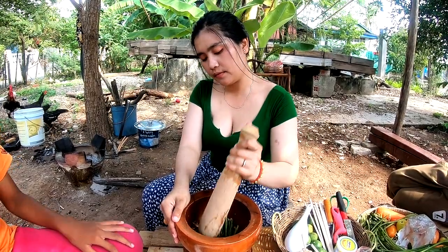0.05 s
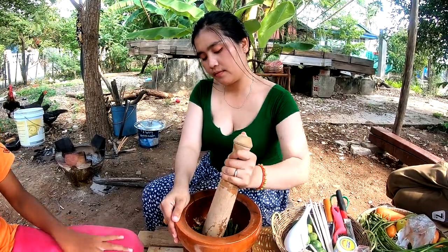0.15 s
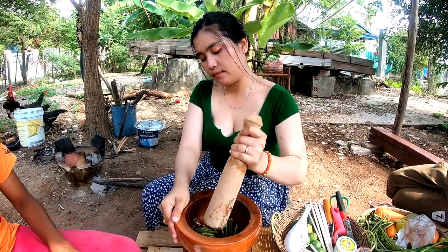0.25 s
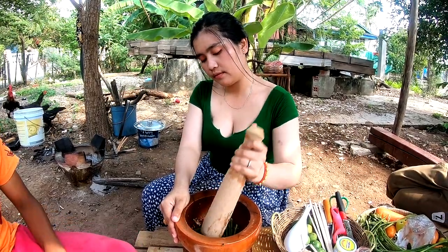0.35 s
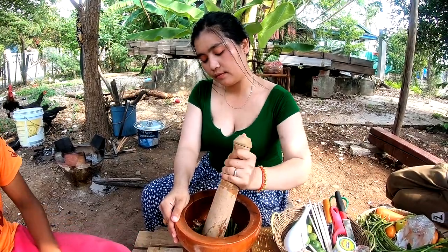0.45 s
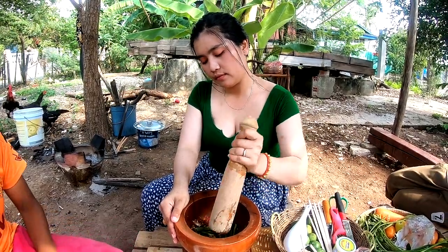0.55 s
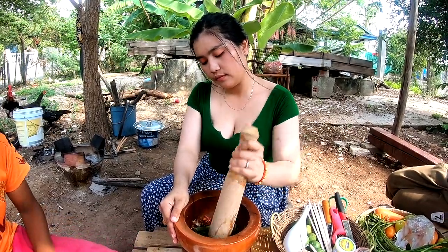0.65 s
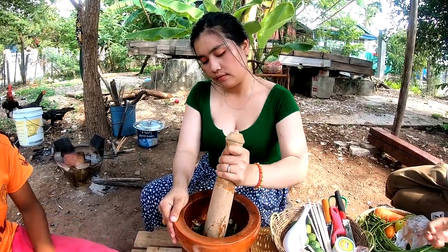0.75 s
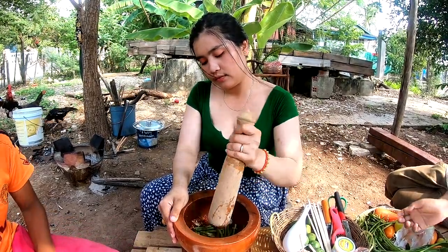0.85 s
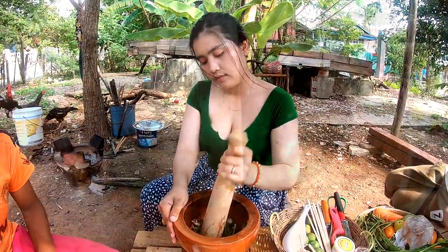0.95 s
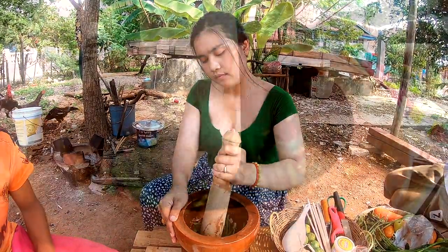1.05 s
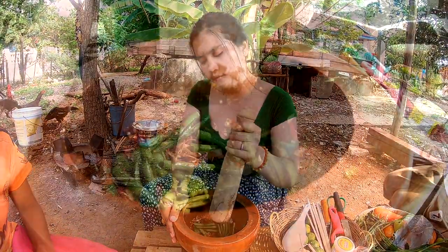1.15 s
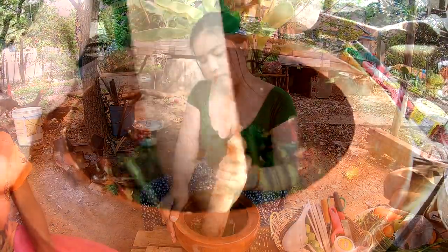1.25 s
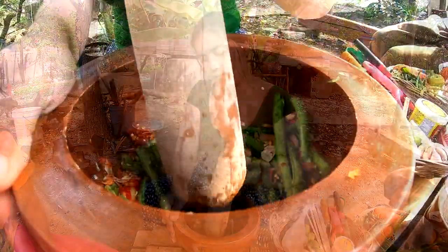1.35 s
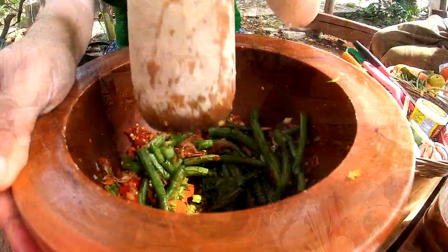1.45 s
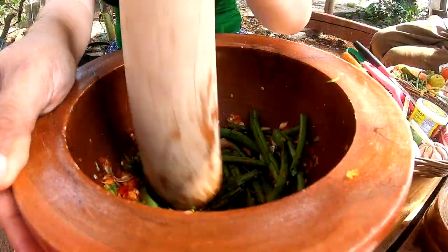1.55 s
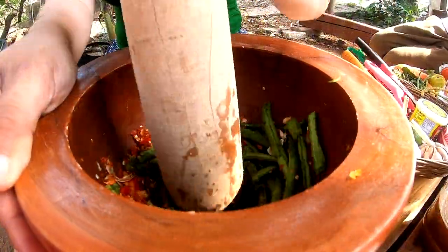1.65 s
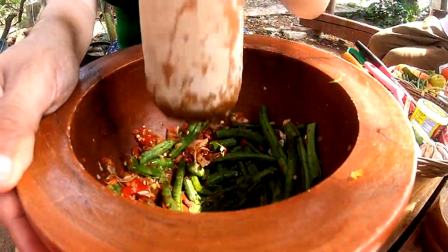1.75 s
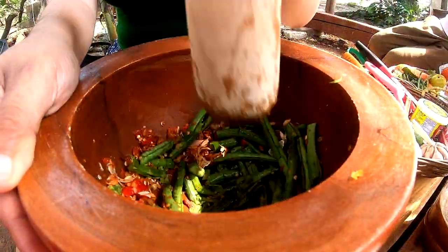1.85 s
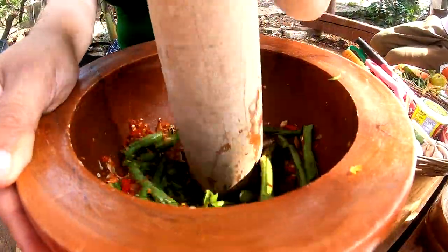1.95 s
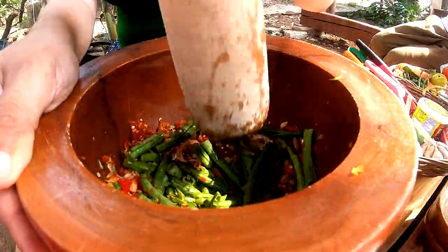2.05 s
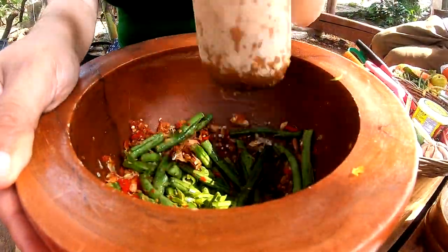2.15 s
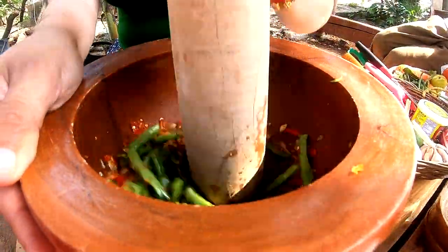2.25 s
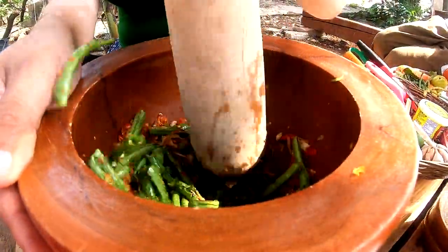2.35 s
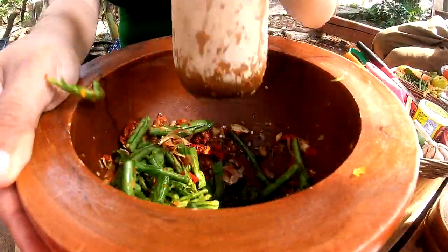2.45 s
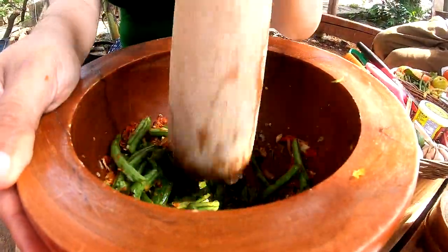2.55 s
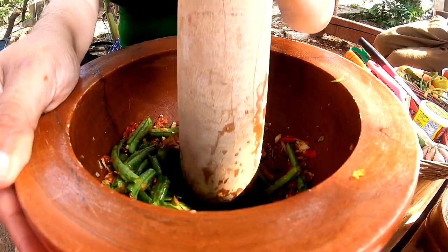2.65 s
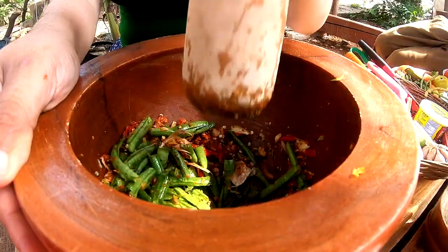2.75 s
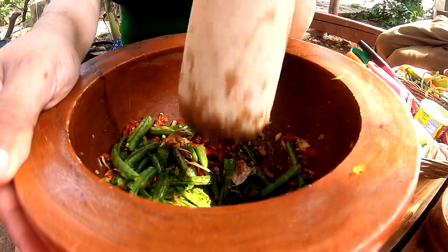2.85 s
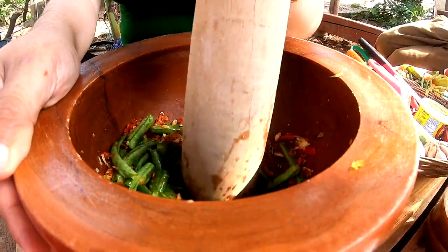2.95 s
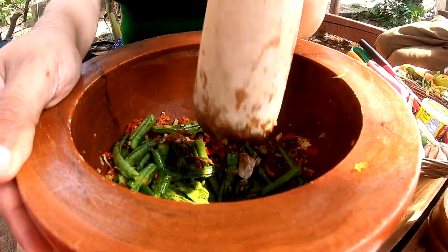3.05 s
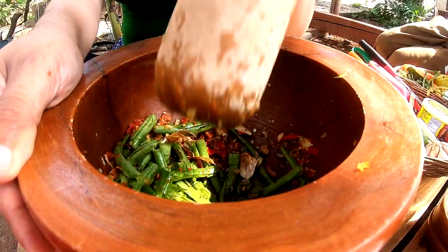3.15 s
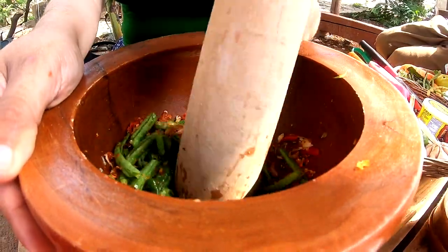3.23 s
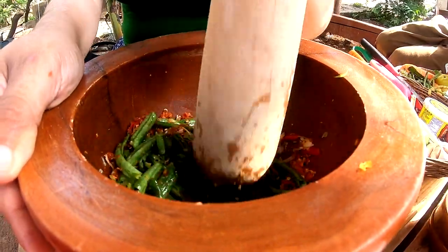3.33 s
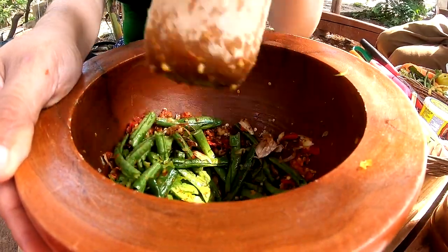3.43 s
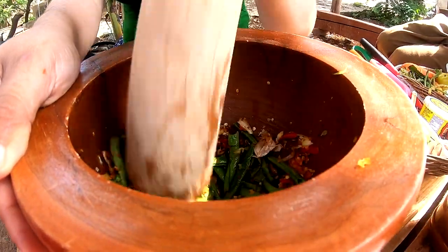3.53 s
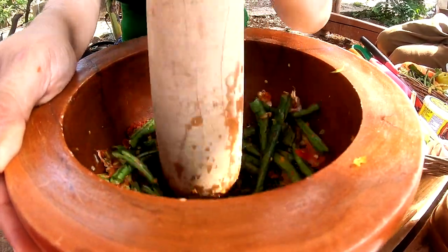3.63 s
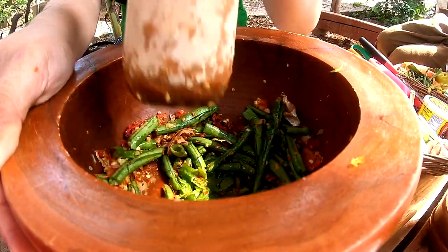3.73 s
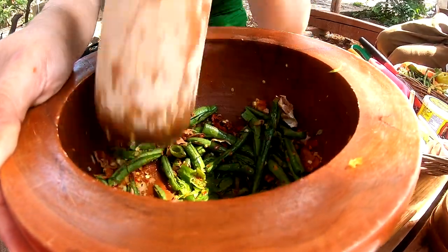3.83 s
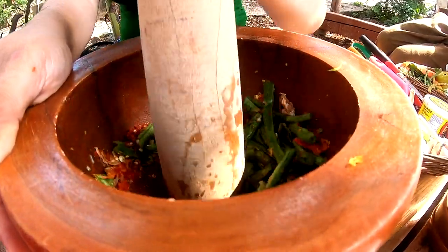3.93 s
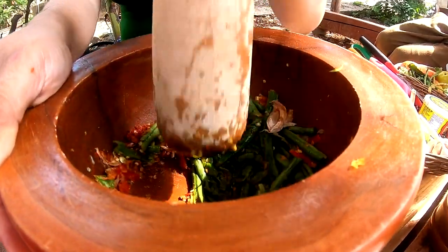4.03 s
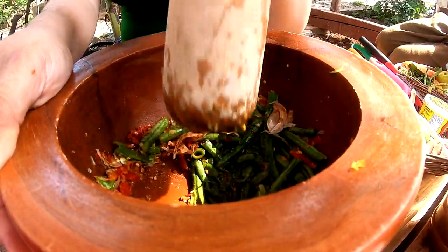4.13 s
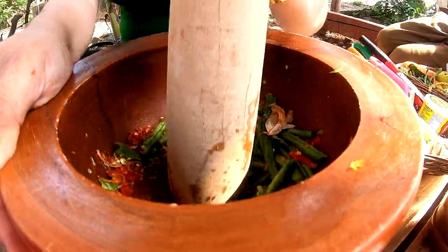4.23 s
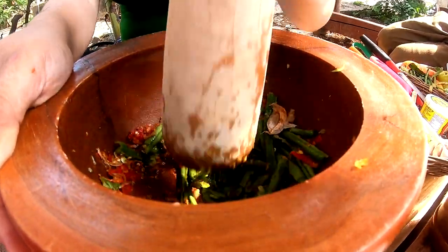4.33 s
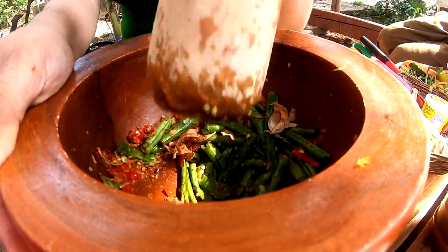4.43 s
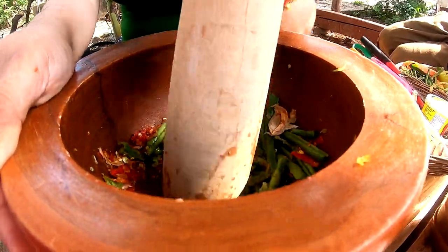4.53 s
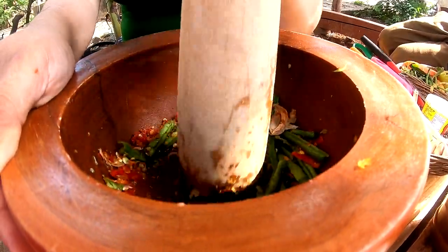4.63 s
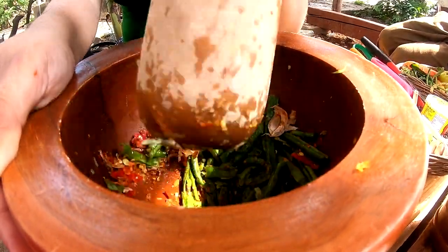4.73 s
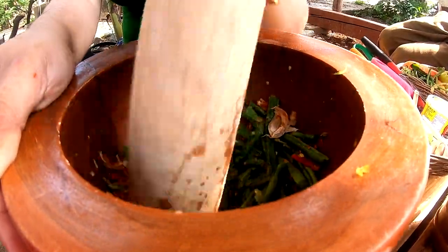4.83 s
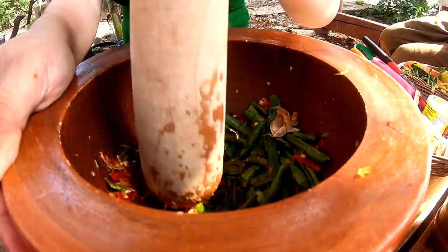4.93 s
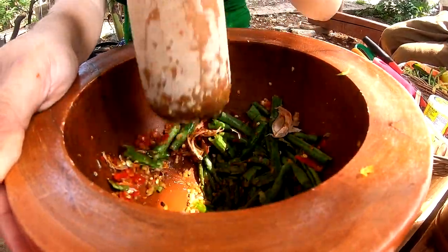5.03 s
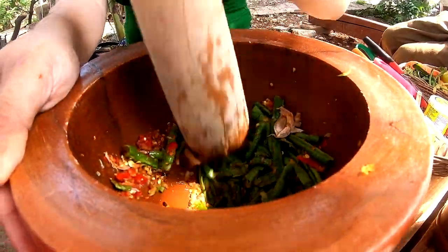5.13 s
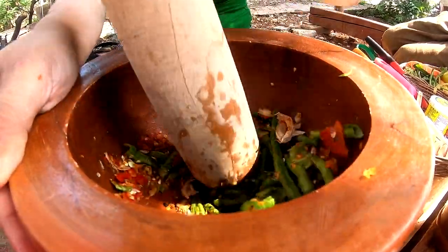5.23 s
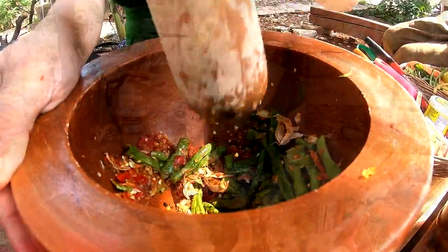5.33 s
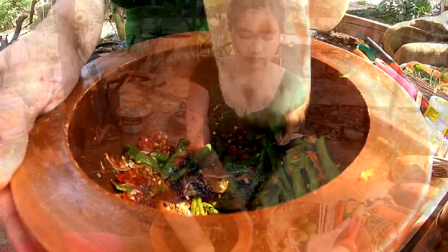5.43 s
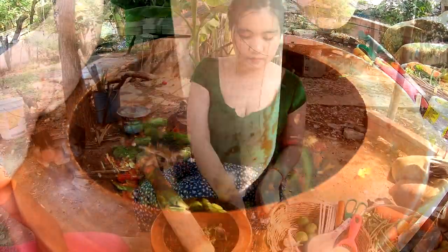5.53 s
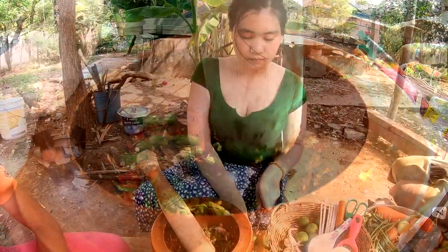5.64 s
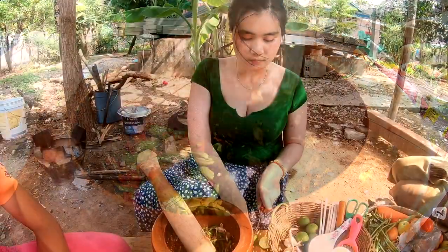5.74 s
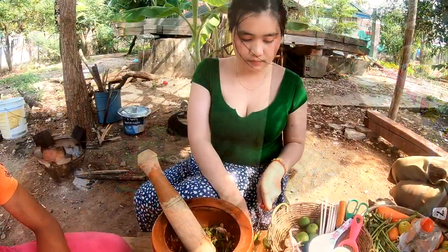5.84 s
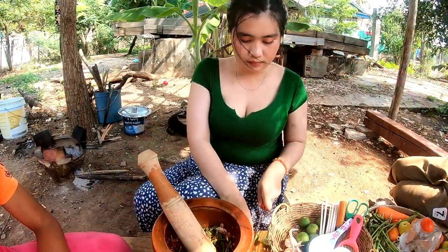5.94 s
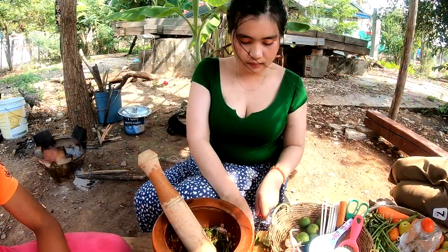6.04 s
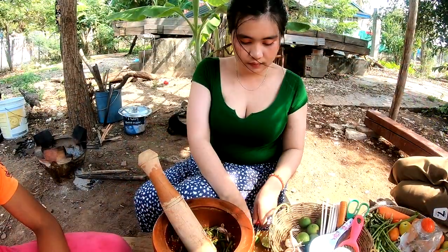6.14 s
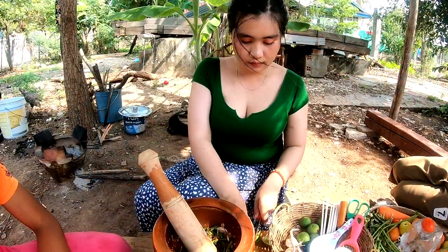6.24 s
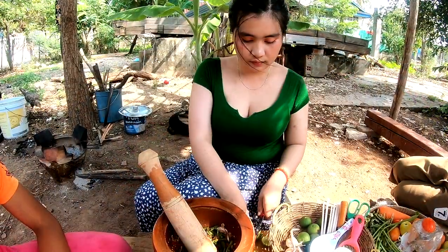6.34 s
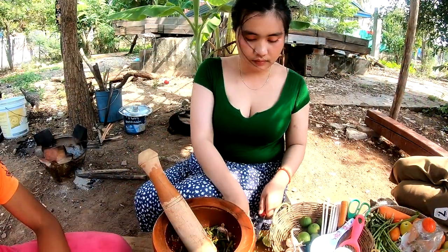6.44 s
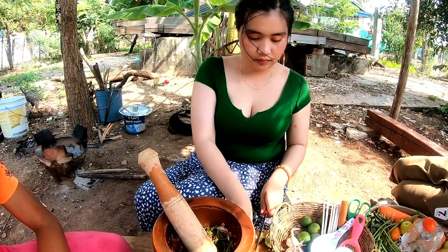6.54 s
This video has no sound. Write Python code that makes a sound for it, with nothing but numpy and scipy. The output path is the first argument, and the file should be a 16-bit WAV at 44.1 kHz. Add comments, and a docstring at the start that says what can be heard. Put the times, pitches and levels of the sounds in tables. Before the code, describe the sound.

A wooden pestle pounds green beans in a mortar with steady thuds and wet crunches, outdoors with wind rumble and peeping chicks.

```python
"""A wooden pestle pounds green beans in a wooden mortar in a yard, about three blows a second.
From the start, wind rumbles at the microphone's two openings and faint far calls sound. Each blow snaps
beans, thumps the ground and knocks the bowl; the mash crunches under the pestle and again as it lifts.
Chicks peep in the first two seconds and once more near the end, among a few low hoots.
After about six seconds the pestle is laid down."""
import sys
import numpy as np
from scipy import signal
from scipy.fft import rfft, irfft, next_fast_len
from scipy.io import wavfile
from scipy.ndimage import uniform_filter1d

SR = 44100
rng = np.random.default_rng(int(sys.argv[2]) if len(sys.argv) > 2 else 0)


def generate_wav(sig):
    """Save sig (samples, or channels by samples) to the path in sys.argv[1] as 16-bit PCM at SR."""
    pcm = np.round(np.clip(np.atleast_2d(sig).T, -1, 1) * 32767).astype(np.int16)
    wavfile.write(sys.argv[1], SR, pcm)


N = 290202

# The pestle sinks in, lands and lifts out; in the last row it is laid down. Each row: start in seconds,
# wait until landing in seconds, thud level in dB, thud pitch in Hz, squelch level in dB,
# pressing level in dB, wait until lifting in seconds, lifting level in dB.
BLOWS = [(0.104, 0.0065, -3.5, 136.5, -22, -26.5, .11, -34.5),
         (0.409, 0.0055, -6, 116, -20, -26.5, 0.12, -38.5),
         (0.707, 0.0035, -11, 100, -23.5, -30, 0.11, -38), (0.979, 0.021, -2.5, 121, -20, -23, .12, -31.5),
         (1.275, 0.014, -5.5, 141, -19, -26, 0.12, -36), (1.585, 0.0045, -11, 77, -18, -21.5, 0.12, -31),
         (1.924, 0.00054, -20, 75, -10.5, -15.5, 0.12, -33),
         (2.253, .003, -6, 148, -16.5, -18.5, 0.12, -34), (2.61, 0.0082, -2, 102, -17, -26, 0.11, -32.5),
         (2.929, 0.0037, 0.5, 86.5, -16.5, -20.5, 0.1, -33),
         (3.242, 0.0063, -4.5, 81, -19.5, -17.5, 0.099, -42.5),
         (3.575, 0.0039, -10, 70, -19, -17, 0.11, -38), (3.9, 0.0048, -3, 100.4, -15, -21.5, 0.11, -40.5),
         (4.225, 0.01244, -4.5, 135.4, -14.5, -20.5, .12, -30.5),
         (4.543, .003, -4, 100, -26, -33.5, 0.092, -40.5),
         (4.834, 0.0043, -6.5, 116.5, -29.5, -67, 0.05, -32.5),
         (5.147, 0.0029, -4, 76.4, -34.5, -71, 0.045, -29.5), (5.507, .014, -13, 153, -10, -16, .099, -41),
         (5.853, 0.0051, -7, 105.6, -24.5, -30, .12, -40.5),
         (6.261, 0.0043, -26, 157, -38, -49, 0.078, -59)]
# Wood meets wood. Each row: start in seconds, level in dB, the pitch it stirs most in Hz.
KNOCKS = [(0.111, -22.5, 1080), (0.128, -21, 860), (0.415, -16.5, 860), (0.708, -36, 800),
          (0.742, -35.5, 2160), (0.998, -27, 1200), (1.014, -18.5, 1540), (1.282, -16.5, 610),
          (1.303, -22.5, 480), (1.612, -24.5, 676), (1.923, -31, 1760), (1.942, -26, 690), (2.02, -26, 452),
          (2.257, -12.5, 685), (2.28, -19.5, 302), (2.469, -38, 563), (2.613, -36, 670), (2.633, -17, 530),
          (2.929, -28, 720), (2.949, -16, 1214), (3.246, -27, 1366), (3.266, -53, 537), (3.327, -29.5, 428),
          (3.597, -29.5, 592), (3.67, -28, 445), (3.907, -16, 600), (4.246, -17.5, 1010), (4.546, -16, 463),
          (4.842, -19, 680), (4.868, -24.5, 560), (5.151, -27.5, 500), (5.529, -28, 910),
          (5.879, -21.5, 1100), (6.266, -27.5, 1460)]
# The bowl's own tones. Each row: pitch in Hz, level in dB, base time to fade by 60 dB in seconds.
BOWL_TONES = [(232.4, 13.5, 0.045), (303, -16, 0.13), (469, 1.5, 0.026), (629.6, 0, 0.045),
              (746, -0.5, 0.02), (940, 6.5, 0.0097), (1260, 4, 0.019), (1666, 12, 0.012), (2160, 16, 0.013),
              (2800, 5, 0.01)]
# Beans and crumbs break. Each row: start in seconds, level in dB, ringing pitch in Hz.
SNAPS = [(0.107, -15, 4950), (0.198, -24, 5470), (0.4108, -18.5, 6070), (0.4797, -24.5, 6300),
         (0.664, -36, 6260), (0.7114, -22, 5940), (0.778, -28, 5700), (0.977, -21, 3240),
         (0.9991, -15.5, 3340), (1.187, -44, 5920), (1.278, -14, 3300), (1.373, -24.5, 5540),
         (1.5632, -32, 4370), (1.59, -11.5, 4900), (1.6464, -21, 5320), (1.6737, -22, 5300),
         (1.714, -23, 6000), (1.9205, -10.5, 5900), (2.013, -26.5, 4230), (2.043, -33, 4940),
         (2.1023, -31.5, 5170), (2.256, -21, 2630), (2.375, -23, 5730), (2.615, -6.5, 5300),
         (2.6389, -23, 5360), (2.6779, -16, 6860), (2.7833, -34, 4540), (2.812, -46, 5230),
         (2.9331, -7.5, 4770), (3.003, -20.5, 4400), (3.1207, -48, 5780), (3.2451, -14, 5650),
         (3.342, -30.5, 6300), (3.4346, -46, 5000), (3.578, -8, 3480), (3.592, -19.5, 2980),
         (3.674, -25, 5640), (3.903, -17.5, 3430), (3.9823, -25, 5540), (4.191, -47, 3300),
         (4.222, -7, 4860), (4.248, -16, 2730), (4.3263, -16, 4470), (4.4328, -42, 5640),
         (4.475, -46, 5770), (4.5436, -12, 5230), (4.629, -23.5, 6250), (4.8683, -35, 5440),
         (5.173, -18, 3390), (5.19, -13.5, 3120), (5.205, -19, 3300), (5.2474, -34, 5390),
         (5.333, -43.5, 4540), (5.505, -17.5, 6400), (5.521, -14.5, 3330), (5.597, -32, 5740),
         (5.8563, -11, 5060), (5.879, -32, 2890), (5.954, -27, 4370), (5.9784, -37, 2600),
         (6.152, -38, 2300), (6.168, -37.5, 3440), (6.265, -33.5, 2330), (6.457, -60, 6000)]
# The tone colour of dry crunch and wet squelch. Each row: frequency in Hz, level in dB.
CRUNCH_COLOUR = [(710, -30), (1200, -7), (2510, -11), (2760, -5.5), (3790, -4.5), (4170, -2.5), (4750, -7),
                 (5410, 1.5), (7330, -7), (8350, -12), (12500, -18), (16000, -39)]
SQUELCH_COLOUR = [(120, -1.5), (200, -2.5), (725, -13), (948, -15.5), (1070, -20.5), (1820, -16.5),
                  (2600, -15), (3380, -68), (5720, -120)]
# Peeps, far calls and hoots. Each row: start in seconds, length in seconds, final pitch in Hz,
# level in dB, blur of the pitch in Hz.
CALLS = [(0, 0.065, 1330, -51, 23), (.28, 0.14, 2570, -49, 800), (0.553, 0.069, 2570, -46.5, 630),
         (0.626, .11, 6450, -39, 1100), (0.769, 0.19, 6550, -42.5, 970), (1.81, 0.16, 6550, -37.5, 1120),
         (4.07, .13, 1436, -54, 54), (4.406, 0.11, 1476, -59, 32), (5.63, 0.2, 557, -50.5, 33),
         (5.701, 0.14, 6560, -43, 1300), (6.062, 0.14, 344, -41.5, 29), (6.227, 0.044, 5800, -47, 410),
         (6.299, 0.21, 315, -45, 15)]
# The wind's strength. Each row: time in seconds, rumble in dB, buffeting in dB,
# how much louder the rumble is on the left in dB.
WIND_LEVELS = [(0.0, -38.5, -33, -5), (0.86, -27.5, -38, -9), (1.19, -27, -32.5, -9.5),
               (1.39, -39.5, -33, 7), (1.72, -27, -43.5, -7.5), (2.12, -23.5, -24, -0.5),
               (2.47, -34, -29.5, -6.0), (3.66, -21.5, -37.5, -3), (3.7, -22, -36.5, 2),
               (3.9, -26.5, -35, -1.5), (5.09, -29.5, -33, 3), (5.83, -25, -32, 2.5),
               (5.86, -22.5, -32.5, -19), (6.17, -30, -33, 6), (6.21, -35.5, -41.5, -10),
               (6.58, -28.5, -33.5, -11)]
# Swirls of air pop on the openings. Each row: start in seconds, level in dB, pitch in Hz,
# how much louder on the left in dB.
PUFFS = [(1.048, -18, 50.6, 8), (1.789, -18, 94.5, -9), (2.132, -11, 80, -1), (2.369, -16.5, 115, 0),
         (2.716, -19, 108, -22), (2.9, -12, 31, -5), (3.077, -19, 32.4, -11), (4.628, -15.5, 31.6, 1),
         (4.701, -16.5, 30, 26), (4.78, -13, 60, 26), (5.158, -11, 60, -9), (5.331, -18.5, 37.5, 17),
         (6.206, -17.5, 56.5, -18), (6.428, -18, 59.2, -13.5), (6.508, -19.5, 118, -15)]
# The yard's background. Each row: time in seconds, rustle in dB, high hiss in dB.
YARD_LEVELS = [(0, -58, -66.5), (.35, -50.5, -60.5), (.88, -55, -54), (1.43, -60.5, -80),
               (1.83, -57, -65.5), (3.66, -60, -67), (4.99, -60, -73), (5.72, -58.5, -66),
               (6.08, -53.5, -57.5), (6.58, -56.5, -68.5)]
# The tone colour of each wind and yard noise. Each row: frequency in Hz, level in dB.
RUMBLE_COLOUR = [(8.8, -40), (15, -1), (110, -8), (140, -43.5), (240, -120)]
BUFFET_COLOUR = [(47, -6), (80, -6), (126, -5), (376, -28), (500, -34), (650, -40), (1100, -93.5)]
RUSTLE_COLOUR = [(210, -15), (350, -7), (485, -3), (1020, -6), (3410, -12), (3960, -16), (5560, -18.5),
                 (12000, -35.5), (15600, -65), (22000, -120)]
HISS_COLOUR = [(2470, -27.5), (4200, -3.5), (4770, -2), (5580, 2.5), (6270, 8.5), (7200, -52),
               (9360, -54.5), (15800, -120)]
# The left microphone opening compared with the right. Each row: frequency in Hz, level in dB, how far its
# wave is ahead in radians, likeness from 0 to 1 for near sound, likeness for far sound and buffeting.
OPENINGS = [(40, -3, 0, .8, .3), (100, -11, 0, .85, .4), (260, -18, .1, .8, .4), (350, -17, 2.1, .75, .4),
            (520, -9, 2.55, .95, .7), (1000, 0, 2.4, .96, .9), (2000, 0, 2.0, .94, .85),
            (3300, -1, .8, .9, .75), (4500, -10, .7, .85, .7), (5600, -16, 1.3, .6, .3),
            (7000, -7, 2.2, .45, .3), (8200, 0, 2.8, .4, .3), (10500, -4, 3.0, .35, .3),
            (14000, -8, 3.0, .35, .3)]

# A FADE is the time a sound takes to drop by 60 dB.
THUD_FADE_S, GRUMBLE_FADE_S, GRUMBLE_GAIN = 0.031, 0.2, 0.33
BOWL_FADE_SPEED, FOCUS_DB = 0.92, 16  # tones an octave from a knock's pitch are FOCUS_DB weaker
CRACK_FADE_S, TEAR_FADE_S, TEAR_DB = 0.011, 0.032, -5
PRESS_FADE_S, HARD_PRESS_DB, OOZE = 0.15, -14.5, 0.57  # OOZE stretches the fade of softer presses
LIFT_RISE_S, LIFT_FALL_S = 0.016, 0.019
BURIED_TOP_HZ, BURIED_S = 8000, 0.058  # under the pestle the crunch is dull for a moment
GLIDE_BLURS, GLIDE_SHARE = 2.1, 0.11  # a call's rise: depth in blur widths, time as a share of its length
OVERLOAD_SHARPNESS, OVERLOAD_GAIN, TOP_HZ = 6, 1.05, 16200


def thuds():
    """The pestle lands heavily, then the ground under the mortar grumbles."""
    out, t = np.zeros(N), np.arange(6000) / SR
    ground = signal.lfilter(*signal.butter(2, [70, 280], "bandpass", fs=SR), rng.standard_normal(N))
    ground = unit_level(ground)
    grumble_shape = gain(-60 * t / GRUMBLE_FADE_S) * (1 - np.exp(-(t / 0.014) ** 2))
    for start, landing_s, db, hz, *_ in BLOWS:
        grumble = ground[round(start * SR):][:len(t)] * grumble_shape
        thud = soft_push(hz, THUD_FADE_S, rise_s=0.0065, sag=0.11)
        add(out, start + landing_s, gain(db) * (thud + GRUMBLE_GAIN * grumble))
    return out


def knocks():
    """A hard touch and a crumbly contact ring the bowl briefly; the mash shifts its tones each time."""
    out, t = np.zeros(N), np.arange(3000) / SR
    hz, tone_db, fade_s = np.transpose(BOWL_TONES)[:, :, None]
    chance = rng.standard_normal((len(KNOCKS), 2, len(BOWL_TONES), 1))
    grit = rng.standard_normal((len(KNOCKS), 900))
    for (start, db, struck_hz), (level_shift, pitch_shift), crumbs in zip(KNOCKS, chance, grit):
        struck_db = -FOCUS_DB * np.log2(hz / struck_hz) ** 2 + 1.8 * level_shift
        tones = np.sin(2 * np.pi * hz * (1 + 0.04 * pitch_shift) * t)
        ring = (gain(tone_db + struck_db - 60 * t * BOWL_FADE_SPEED / fade_s) * tones).sum(0)
        contact = crumbs * gain(-60 * t[:900] / 0.034)
        contact[0] += 16  # the hard first touch
        knock = signal.lfilter(*signal.butter(2, 5000, fs=SR), signal.fftconvolve(ring, contact))
        add(out, start, gain(db) * knock / np.sqrt(np.mean(knock[:500] ** 2)))
    return out


def snaps():
    """A bean cracks sharply, then its fibres tear and the piece rings; wetness dulls the highs."""
    out, t = np.zeros(N), np.arange(3000) / SR
    fibres = coloured(lumpy_noise(1.4, 0.0002), CRUNCH_COLOUR)
    fibres = signal.lfilter(*signal.butter(4, 8000, fs=SR), fibres)
    crack, tear = gain(-60 * t / CRACK_FADE_S), gain(TEAR_DB - 60 * t / TEAR_FADE_S)
    shape = (crack + tear) * (1 - np.exp(-t / 0.0009))
    for start, db, hz in SNAPS:
        burst = fibres[round(start * SR):][:len(t)]
        ring = unit_level(resonate(burst, hz, width_hz=1000))
        add(out, start, gain(db) * shape * (burst + 0.5 * ring))
    return out


def mash():
    """Each stroke squeezes a high dry crunch and a low wet squelch out of the clumped beans."""
    buried_level, open_level, wet_level = np.zeros((3, N))
    early_s = 0.03
    t = np.arange(16000) / SR - early_s
    for start, *_, squelch_db, press_db, lift_s, lift_db in BLOWS:
        fade_s = PRESS_FADE_S * gain(OOZE * np.clip(HARD_PRESS_DB - press_db, 0, 20))
        since_lift = np.maximum(t - lift_s, 0)
        touching = np.exp(-0.5 * (since_lift / LIFT_FALL_S) ** 2)  # falls as the pestle leaves
        lead_in = 0.18 * np.exp(t / 0.0055)  # a faint crunch swells just before each blow
        sink = np.where(t < 0, lead_in, 1 - 0.75 * np.exp(-abs(t) / 0.0032))
        press = gain(press_db - 60 * abs(t) / fade_s) * sink * (0.14 + 0.66 * touching)
        settle = gain(-13 - 60 * since_lift / 0.35)  # crumbs slide back
        lift_rise = np.exp(-0.5 * (np.minimum(t - lift_s, 0) / LIFT_RISE_S) ** 2)
        lift = gain(lift_db) * lift_rise * (touching + settle)
        covered = np.exp(-(np.maximum(t, 0) / BURIED_S) ** 2)
        add(buried_level, start - early_s, press * np.sqrt(covered))
        add(open_level, start - early_s, np.hypot(press * np.sqrt(1 - covered), lift))
        add(wet_level, start - early_s, np.hypot(gain(squelch_db - press_db) * press, gain(-1) * lift))
    clumps = gain(3.96 * unit_level(uniform_filter1d(rng.standard_normal(N), 250)))
    grains = patchy(lumpy_noise(2.4, 0.0031) * clumps, spread_db=1.7)
    crunch = coloured(grains + 0.4 * crackle(per_second=700, spread_db=2.8), CRUNCH_COLOUR)
    squelch = coloured(patchy(lumpy_noise(0.75, 0.0033) * clumps, spread_db=1.5), SQUELCH_COLOUR)
    dull_crunch = signal.lfilter(*signal.butter(3, BURIED_TOP_HZ, fs=SR), np.roll(crunch, SR))
    return buried_level * dull_crunch + open_level * crunch + wet_level * squelch


def crackle(per_second, spread_db):
    """Tiny cracks and wet pops in the mash, each a few waves at its own pitch."""
    when, pitch, size = rng.random((round(per_second * N / SR), 3, 1)).transpose(1, 0, 2)
    step = np.arange(200)
    cycles = 1800 * 5.5 ** pitch * step / SR
    size_db = spread_db * np.minimum(-np.log(size + 1e-9), 4)
    pops = gain(size_db) * np.sin(2 * np.pi * cycles) * np.exp(-cycles / 6.4) * (1 - np.exp(-cycles))
    places = np.round(when * N).astype(int) + step
    return unit_level(np.bincount(places.ravel(), pops.ravel(), N)[:N])


def birds():
    """Each call glides up and levels off; a raspy band just below stands for the yard's echoes."""
    out = np.zeros(N)
    for start, length_s, end_hz, db, blur_hz in CALLS:
        progress = np.arange(0, 1, 1 / (length_s * SR))
        hz = end_hz - GLIDE_BLURS * blur_hz * np.exp(-progress / GLIDE_SHARE)
        rasp_hz = hz - 0.5 * blur_hz
        noise = rng.standard_normal((2, len(progress)))
        voice = resonate(noise[0], hz, 0.22 * blur_hz)
        rasp = resonate(resonate(noise[1], rasp_hz, blur_hz), rasp_hz, blur_hz)
        call = unit_level(unit_level(voice) + 1.2 * unit_level(rasp))
        shape = np.minimum(progress / 0.28, 1) * (1 - progress) ** 0.66
        add(out, start, gain(db) * call * shape)
    return out


def wind():
    """Air rumbles and pops at each microphone opening; the two sides share part of it."""
    level, balance = gain_curve(WIND_LEVELS, 1), np.sqrt(gain_curve(WIND_LEVELS, 3))
    left = coloured(lumpy_noise(1.2, 0.095), RUMBLE_COLOUR)
    right = coloured(lumpy_noise(2.2, 0.028), RUMBLE_COLOUR)
    out = level * np.array([(left + 0.22 * right) * balance, right / balance])
    for start, db, hz, left_db in PUFFS:
        puff = -gain(db) * soft_push(hz, fade_s=7.1 / hz, rise_s=0.19 / hz, sag=0.018)
        for side, share in zip(out, 2 / (1 + gain([-left_db, left_db]))):
            add(side, start, share * puff)
    return out


def yard():
    """Far rustle, a high hiss swelling with the chicks' echo, and wind buffeting the microphone's case."""
    rustle = gain_curve(YARD_LEVELS, 1) * coloured(lumpy_noise(3.9, 0.046), RUSTLE_COLOUR)
    hiss = gain_curve(YARD_LEVELS, 2) * coloured(lumpy_noise(2.9, 0.006), HISS_COLOUR)
    buffeting = gain_curve(WIND_LEVELS, 2) * coloured(lumpy_noise(2.33, 0.048), BUFFET_COLOUR)
    return rustle + hiss + buffeting


def two_openings(sound, other, likeness_column):
    """The right opening hears the sound; the left hears it shaded, shifted and blended with another."""
    size = next_fast_len(N + 4096)
    hz = np.fft.rfftfreq(size, 1 / SR)
    shade, lead = gain(look_up(OPENINGS, hz)), look_up(OPENINGS, hz, column=2)
    likeness = np.clip(look_up(OPENINGS, hz, likeness_column), 0, 1)
    right, unlike = rfft(sound, size), rfft(other, size)
    left = shade * (likeness * np.exp(1j * lead) * right + np.sqrt(1 - likeness ** 2) * unlike)
    average_gain = np.sqrt(1 + shade ** 2 + 2 * shade * likeness * np.cos(lead)) / 2
    return irfft(np.array([left, right]) / average_gain, size)[:, :N]


def scattered(sound):
    """The sound arrives by paths a few milliseconds longer, with the same tone colour."""
    size = next_fast_len(N + 4096)
    hz = np.fft.rfftfreq(size, 1 / SR)
    delays_s = np.array([[0.0013], [0.0031], [0.0057]])
    late = np.exp(-2j * np.pi * hz * delays_s)
    return irfft(rfft(sound, size) * np.prod((late - 0.6) / (1 - 0.6 * late), axis=0), size)[:N]


def soft_push(hz, fade_s, rise_s, sag):
    """A low wave swells and swings a few times, its pitch sagging as it dies."""
    t = np.arange(6000) / SR
    cycles = hz * (t + sag * fade_s * (1 - np.exp(-t / (0.26 * fade_s))))
    wave = -np.sin(2 * np.pi * cycles) * (1 - np.exp(-(t / rise_s) ** 2)) * gain(-60 * t / fade_s)
    return wave / abs(wave).max()


def resonate(sound, hz, width_hz):
    """Keeps a band around a pitch that may move: shift it down, smooth twice, shift it back."""
    turn = np.exp(2j * np.pi * np.cumsum(hz * np.ones(len(sound))) / SR)
    hold = np.exp(-np.pi * width_hz / SR)
    return 2 * (turn * signal.lfilter([(1 - hold) ** 2], [1, -2 * hold, hold * hold], sound / turn)).real


def lumpy_noise(spread_db, lump_s):
    """Noise whose level wanders at random."""
    size = max(round(lump_s * SR), 1)
    wander = unit_level(uniform_filter1d(uniform_filter1d(rng.standard_normal(N), size), size))
    return rng.standard_normal(N) * gain(spread_db * wander)


def patchy(sound, spread_db):
    """Makes random loud and weak patches, each about 1000 Hz wide and ten milliseconds long."""
    grid = signal.stft(sound, nperseg=128)[2]
    patches = uniform_filter1d(rng.standard_normal(grid.shape), size=3, axis=0)
    patches = unit_level(uniform_filter1d(patches, size=7, axis=1))
    return unit_level(signal.istft(grid * gain(spread_db * patches), nperseg=128)[1][:N])


def coloured(sound, colour):
    """Gives a sound a tone colour and an average level of 1."""
    size = next_fast_len(N)
    gains = gain(look_up(colour, np.fft.rfftfreq(size, 1 / SR)))
    return unit_level(irfft(rfft(sound, size) * gains, size)[:N])


def look_up(table, hz, column=1):
    """Reads a frequency table between its rows."""
    rows = np.array(table)
    return np.interp(np.log(hz + 1), np.log(rows[:, 0] + 1), rows[:, column])


def gain_curve(table, column):
    """Turns a dB column of a time table into a gain for every sample."""
    rows = np.array(table)
    return gain(np.interp(np.arange(N) / SR, rows[:, 0], rows[:, column]))


def gain(db):
    """Turns decibels into a number to multiply by."""
    return 10 ** (np.asarray(db) / 20)


def unit_level(sound):
    """Scales a sound to an average (rms) level of 1."""
    return sound / np.sqrt(np.mean(sound ** 2) + 1e-20)


def add(mix, start_s, sound):
    """Mixes a sound in at its start time."""
    part = mix[round(start_s * SR):][:len(sound)]
    part += sound[:len(part)]


def scene():
    """Mortar near, yard around; crumbs all over the bowl reach the two openings differently."""
    hits_and_calls = thuds() + knocks() + snaps() + birds()
    near = two_openings(hits_and_calls + mash(), scattered(hits_and_calls) + mash(), likeness_column=3)
    far = two_openings(yard(), yard(), likeness_column=4)
    return near + far + wind()


def record(dry):
    """The loudest blows overload the microphone and are flattened; then the very top highs are cut."""
    squashed = OVERLOAD_GAIN * dry / (1 + abs(dry) ** OVERLOAD_SHARPNESS) ** (1 / OVERLOAD_SHARPNESS)
    high_cut = signal.firwin(511, TOP_HZ, window=("kaiser", 9), fs=SR)
    return signal.oaconvolve(np.clip(squashed, -1, 1), high_cut[None], "same")


dry = scene()
out = record(dry)
generate_wav(out)
```